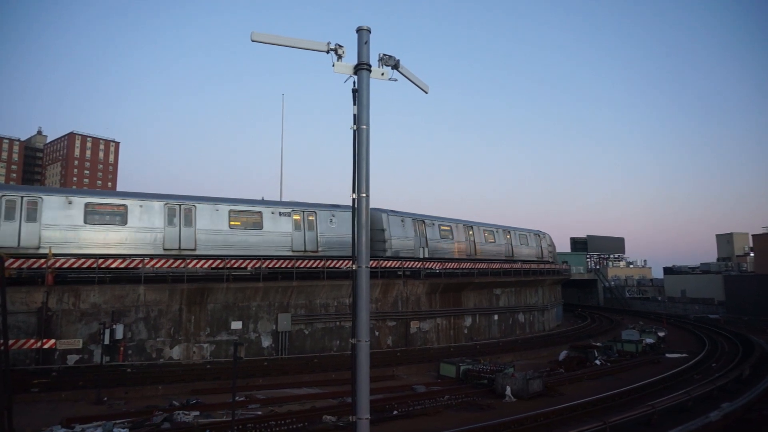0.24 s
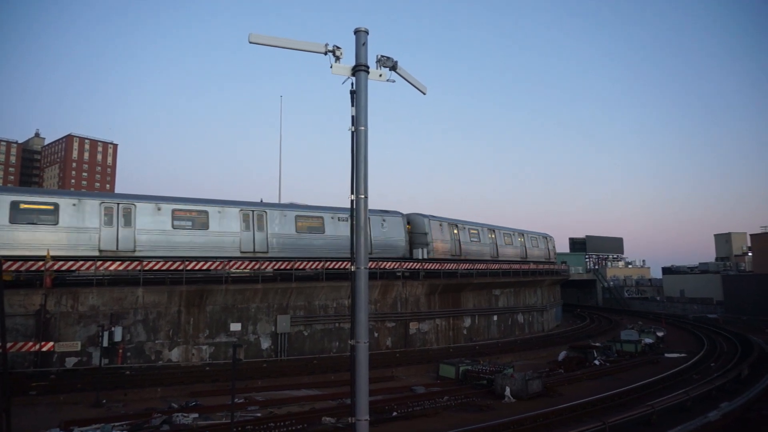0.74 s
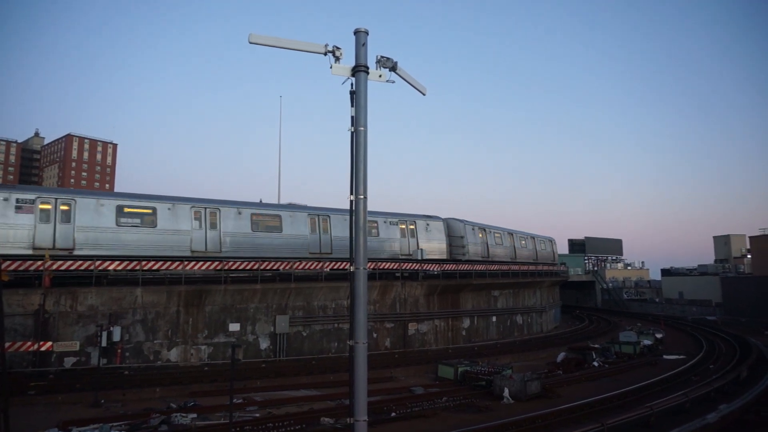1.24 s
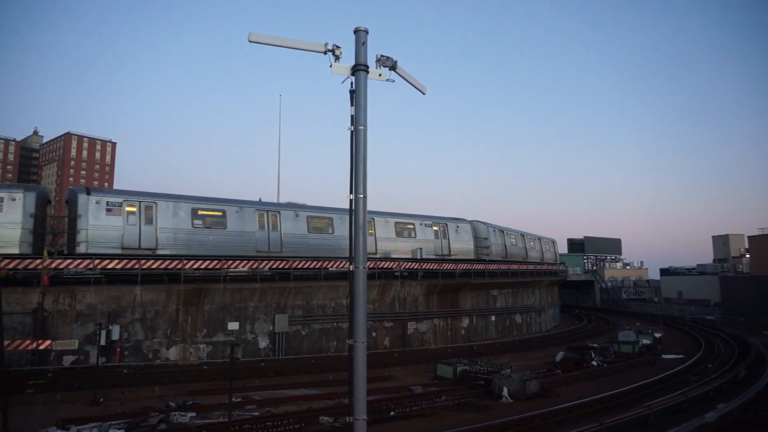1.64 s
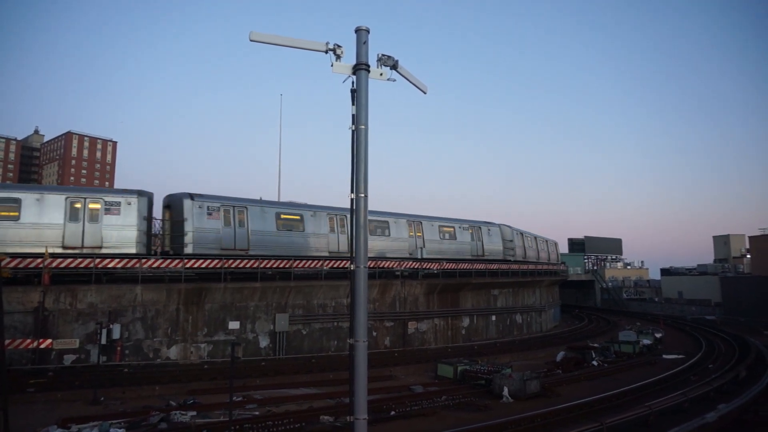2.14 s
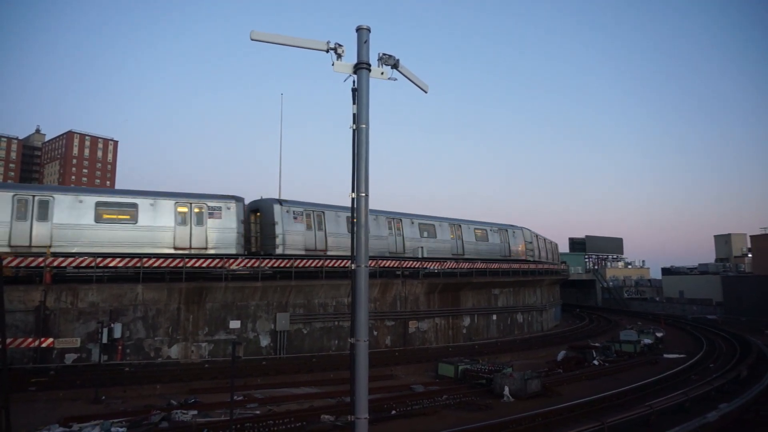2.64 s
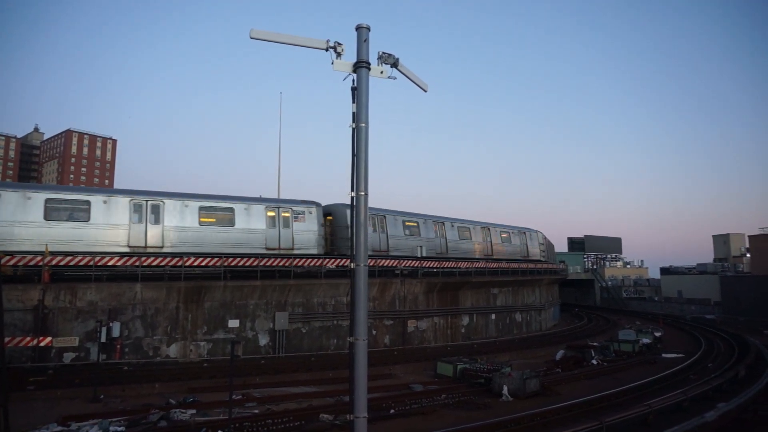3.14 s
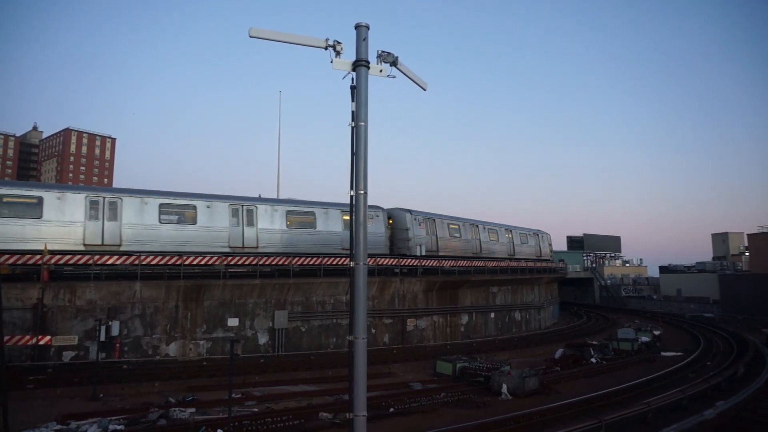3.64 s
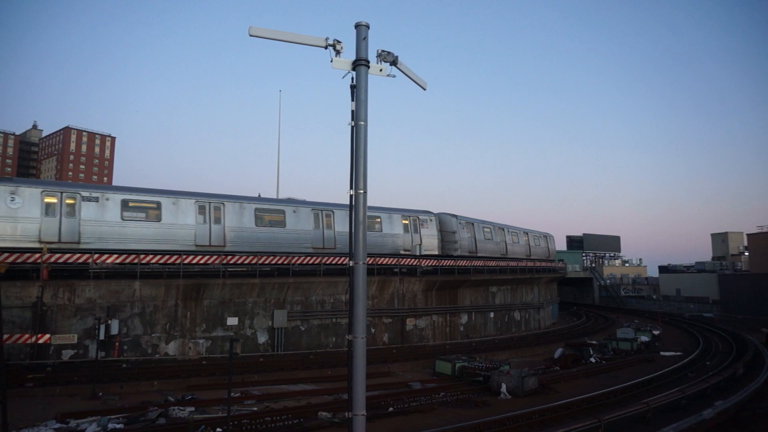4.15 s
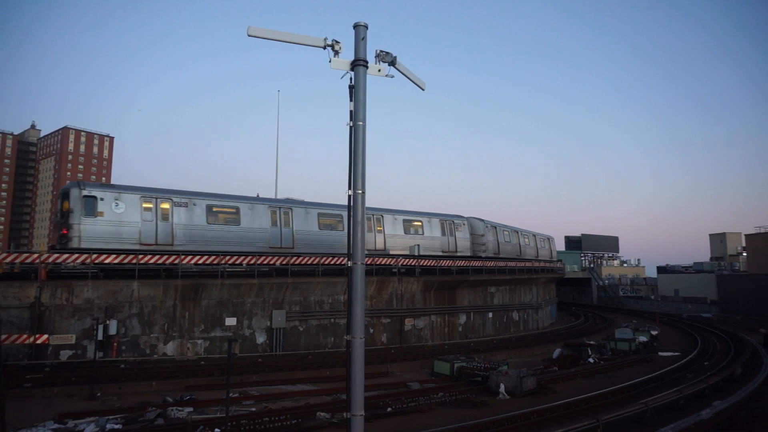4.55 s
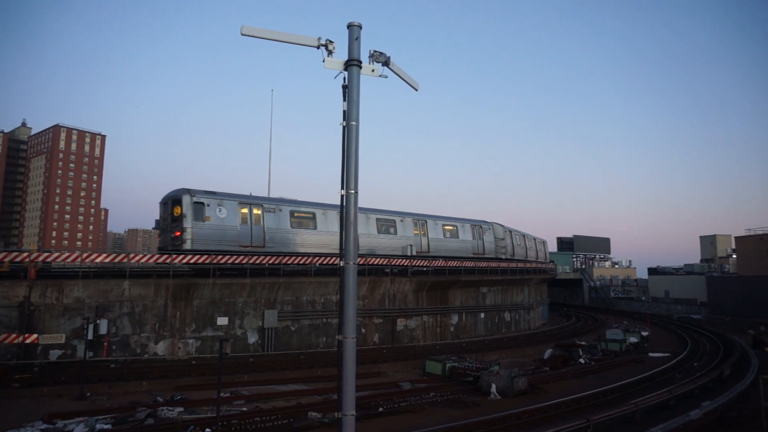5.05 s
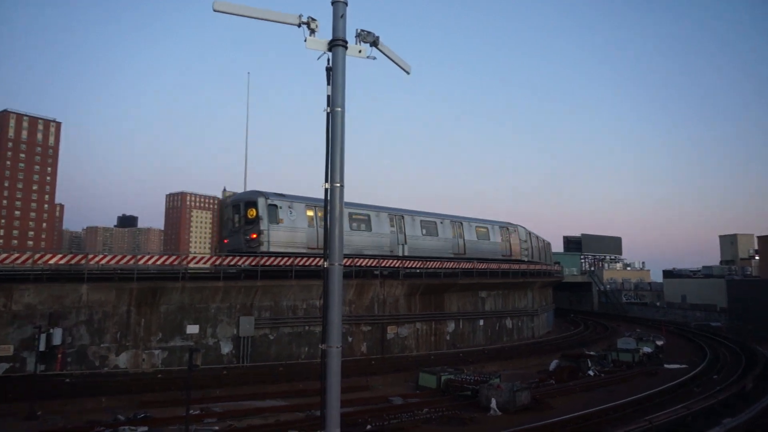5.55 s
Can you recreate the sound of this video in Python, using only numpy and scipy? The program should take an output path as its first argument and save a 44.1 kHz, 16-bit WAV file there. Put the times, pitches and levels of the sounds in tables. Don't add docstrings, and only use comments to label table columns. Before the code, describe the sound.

A train of steel cars rolls round an elevated curve, heard outdoors from across the yard in nearly central stereo. It begins mid-roll with a full, bright roar and a faint very high whine. By 0.4 s a piercing squeal has caught; from 0.6 s it turns raspy and broken, chopped by tiny dropouts as wheels grip and slip, while the roar eases between about 0.8 and 1.7 s. The higher whine sinks slowly in overlapping strands. Bright scrapes and breathy grit come near 0.5, 1.8 and 3.3 s, the last two with a lower scraping tone, and a small tick at 2.9 s. Low structural thumps are heaviest around 3.0 s. The high whine peaks near 4.0 s and the purer main squeal near 4.6 s. After 5 s the rolling grows duller and squeals weaken and falter, then another wheel joins before the cut at 5.8 s.

```python
import sys
import numpy as np
from scipy import signal
from scipy.fft import rfft, irfft, next_fast_len
from scipy.io import wavfile

SR = 44100
rng = np.random.default_rng(int(sys.argv[2]) if len(sys.argv) > 2 else 0)


def elevation(decibels):
    levels = np.asarray(decibels, float)
    return 10 ** (levels / 20)


def transcribe(u):
    v = np.clip(np.atleast_2d(u).T, -1, 1)
    q = np.round(v * 32767).astype(np.int16)
    wavfile.write(sys.argv[1], SR, q)


N = 254898


def squeal():
    return elevation(0.44) * (low_wheel() + late_wheel() + high_wheels())


# time_s, tone_db, rough_db
LOW_SLIP = [(0.1, -62, -50), (.25, -38, -59), (.4, -20, -51), (.62, -21, -24.5), (.9, -18.5, -26),
            (1.4, -21, -24), (1.55, -17, -27.5), (1.9, -27, -24), (2.2, -20, -28.5), (2.4, -22.5, -31.5),
            (3.35, -22, -27), (3.6, -25.5, -31.5), (4.36, -27, -33), (4.56, -18, -41), (4.95, -24.5, -36.5),
            (5.2, -33, -40), (5.5, -28, -43), (5.78, -32, -35)]
# time_s, depth_db, half_length_s
LOW_GRIPS = [(0.619, -4.7, 0.0098), (0.686, -5.5, 0.019), (0.994, 2, 0.012), (1.06, -7, 0.018),
             (1.201, -11, 0.01), (1.379, -3, 0.014), (1.441, -4.5, 0.029), (1.696, -9, 0.015),
             (1.896, -3.5, 0.018), (1.995, -12, 0.0079), (2.183, -5.5, 0.12), (2.267, -0.5, 0.023),
             (2.407, 0, 0.01), (2.48, -2, 0.014), (2.55, -7.5, 0.024), (2.915, -3, 0.023),
             (3.017, -9, 0.012), (3.151, -7.5, 0.021), (3.287, -11.5, 0.0054), (3.402, -15, 0.0093),
             (3.552, -15, 0.013), (3.791, -6, 0.026), (3.957, -10.4, 0.035), (4.18, -9, 0.039),
             (4.442, -10.5, 0.019), (4.837, -4.5, 0.027), (5.096, -10.0, 0.014), (5.24, -13, 0.023),
             (5.48, -25, 0.036), (5.693, -3, 0.022)]


def low_wheel():
    hz = low_hz() + 3 * drift(6.17, count=N, order=2)
    tone_db = in_time(LOW_SLIP)[0] + grip_db(LOW_GRIPS)
    return mode(hz, tone_db, clean=0.89, width_hz=17.0, alike=0.97)


def low_hz():
    start_s, first_hz, last_hz, settle_s = .3, 4794, 4694, 2.8
    elapsed_s = np.maximum(np.arange(N) / SR - start_s, 0)
    return last_hz + (first_hz - last_hz) * np.exp(-elapsed_s / settle_s)


# time_s, pitch_hz, level_db
LATE_WHEEL = [
    (5.1, 4785, -41),
    (5.49, 4782, -42),
    (5.56, 4779, -29),
    (5.78, 4765, -26),
]


def late_wheel():
    out = np.zeros((2, N))
    add(out, LATE_WHEEL, clean=0.69, width_hz=20, alike=0.75)
    return out


# start_s, end_s, first_hz, sink_hz_per_s
HIGH_WHEELS = [
    (0, .55, 6558, 15),
    (.6, 1.95, 6590, 28),
    (1.85, 2.65, 6594, 27),
    (2.6, 5.78, 6543, 31),
    (1.85, 4.4, 6497, 21),
]
HIGH_WHEELS_DB = [-1.5, -0.7, -1.5, -.1, -9.5]
# time_s, tone_db, rough_db
HIGH_SLIP = [(0, -30.5, -35), (.2, -32.5, -35.5), (.6, -38, -38.5), (.8, -29, -33), (1.0, -26, -32),
             (1.4, -35, -33.5), (1.85, -31.5, -36), (2.0, -31.5, -27.5), (2.3, -24, -30.5),
             (2.7, -30.5, -30), (3.2, -27, -29.5), (3.55, -31, -27), (4.0, -19.5, -27.5), (4.4, -26.5, -28),
             (4.8, -24.5, -29), (5.1, -26.5, -33), (5.35, -37, -36.5), (5.78, -26.5, -31.5)]
# time_s, depth_db, half_length_s
HIGH_GRIPS = [(0.607, -12, 0.029), (0.846, -12, 0.011), (0.908, -10.5, 0.042), (1.233, -6.2, 0.059),
              (1.533, -15, 0.021), (1.844, -7.7, 0.062), (1.981, -11, 0.022), (2.147, -6, 0.017),
              (2.265, -5.3, 0.02), (2.424, -7, 0.026), (2.57, -5.2, 0.044), (2.802, -5, 0.011),
              (2.865, -3, 0.016), (2.945, -7, 0.024), (3.089, -7, 0.055), (3.207, -5, 0.014),
              (3.271, -4, 0.015), (3.328, -5, 0.038), (3.767, -9.5, 0.023), (3.901, -12, 0.016),
              (3.987, -6.5, 0.024), (4.137, -11.5, 0.018), (4.288, -4.5, 0.02), (4.45, -10, 0.0079),
              (4.534, -1, 0.028), (4.711, -11, 0.014), (4.887, -7, 0.025), (5.027, -2, 0.022),
              (5.286, -14, 0.049), (5.45, -9, 0.033)]


def high_wheels():
    eases_s = 5.15
    out = np.zeros((2, N))
    for (start_s, end_s, first_hz, sink_hz_per_s), level_db in zip(HIGH_WHEELS, HIGH_WHEELS_DB):
        times_s = np.array([start_s, min(end_s - .01, eases_s), end_s])
        hz = first_hz - sink_hz_per_s * (np.minimum(times_s, eases_s) - start_s)
        rows = np.transpose([times_s, hz, level_db + 0 * hz])
        add(out, rows, clean=0.71, width_hz=16.0, alike=1.0)
    return out * elevation(in_time(HIGH_SLIP)[0] + grip_db(HIGH_GRIPS))


def rasp():
    return low_rasp() + high_rasp() + octave_rasp()


def low_rasp():
    tone_db, rough_db = in_time(LOW_SLIP)
    hz = low_hz()
    skirt_db = -27.5 + 0.33 * (rough_db + 30) + 0.16 * (tone_db + 22)
    out = mode(hz + 12, rough_db + 0.27, clean=0, width_hz=47, alike=0.77)
    out += mode(hz + 30, skirt_db, clean=0, width_hz=141, alike=0.84)
    return out * elevation(0.32 * grip_db(LOW_GRIPS))


def high_rasp():
    rough_db = in_time(HIGH_SLIP)[1]
    hz = low_hz()
    hz = 6550 * hz / hz.mean()
    out = mode(hz, rough_db - .51, clean=0, width_hz=81, alike=0.83)
    out += mode(hz + 40, rough_db - 3.5, clean=0, width_hz=234, alike=0.77)
    return out * elevation(0.26 * grip_db(HIGH_GRIPS))


def octave_rasp():
    rough_db = in_time(LOW_SLIP)[1]
    level_db = -46 + 1.3 * (rough_db + 30) - np.arange(N) / SR
    level_db += 0.26 * grip_db(LOW_GRIPS) + 2.1 * drift(5.7, count=N, order=2)
    return mode(2 * low_hz() + 40, level_db, clean=0, width_hz=150, alike=0.9)


# start_s, length_s, first_hz, level_db
SCRAPES = [(0, .45, 8485, -51), (.5, .28, 8480, -45), (.48, .27, 10295, -48), (1.8, .32, 8460, -47),
           (1.82, .3, 8330, -45), (1.82, .33, 10315, -49), (1.85, .3, 10140, -54), (1.75, .38, 1830, -36.5),
           (3.26, .36, 8440, -44), (3.3, .55, 8330, -46), (3.2, .65, 10255, -44), (3.2, .62, 10130, -47),
           (3.2, .55, 1810, -36.5), (4.35, 1.4, 8335, -57), (0, .65, 3060, -46), (.05, .4, 6655, -41),
           (3.5, .3, 10600, -57), (2.1, 1.2, 10300, -59), (1.0, .9, 8430, -60)]


def scrapes():
    out = np.zeros((2, N))
    attack_s, fade_share, sag_per_s = .08, .5, .006
    for start_s, length_s, first_hz, level_db in SCRAPES:
        times_s = np.array([0, attack_s, length_s * (1 - fade_share), length_s])
        hz = first_hz * (1 - sag_per_s * times_s)
        swell_db = level_db + np.array([-10, 3.5, 1, -12])
        tone = np.transpose([start_s + times_s, hz, swell_db])
        skirt = np.transpose([start_s + times_s, hz, swell_db - 5])
        add(out, tone, clean=.4, width_hz=42, alike=.85)
        add(out, skirt, clean=0, width_hz=0.023 * first_hz, alike=.85)
    return out


# start_s, length_s, level_db
PUFFS = [
    (.315, .09, -42),
    (.53, .2, -47),
    (1.78, .3, -47),
    (2.885, .025, -41),
    (3.25, .3, -49),
    (5.17, .05, -48),
]


def puffs():
    t, level = np.arange(N) / SR, np.zeros(N)
    for start_s, length_s, level_db in PUFFS:
        shape = np.interp(t, [start_s, start_s + .004, start_s + length_s], [0, 1, 0]) ** .5
        level += elevation(level_db) * shape
    noise = rng.standard_normal(N) + .25 * rng.standard_normal((2, N))
    bright = signal.butter(3, [7600, 10600], "band", fs=SR, output="sos")
    return level * rms_one(signal.sosfilt(bright, noise))


# freq_hz, density_db_per_hz
ROAR = [(25, -38.5), (97, -13.5), (230, -8.5), (420, -7.5), (1050, -5.5), (1350, -10.5), (2900, -17),
        (3400, -22.5), (4400, -23), (5700, -28), (7300, -31), (9000, -35), (11200, -37)]
# freq_hz, width_hz, gain_db
BOOMS = [
    (308, 86, 6),
    (587, 280, 6),
    (886, 160, 1.5),
]
# freq_hz, likeness
LIKENESS = [(30, .4), (85, .72), (180, .58), (340, .72), (700, .92), (1400, .72), (2800, .62), (5300, .88),
            (11000, .84)]
ROLL_CENTRES_HZ = (110, 600, 2400, 7500)


def roar(patchy_db, bump_db):
    size = next_fast_len(N)
    hz = np.maximum(np.arange(size // 2 + 1) * SR / size, 1)
    colour_db = at_hz(ROAR, hz)
    for freq_hz, width_hz, gain_db in BOOMS:
        colour_db = colour_db + gain_db / (1 + (2 * (hz - freq_hz) / width_hz) ** 2)
    alike = np.clip(at_hz(LIKENESS, hz), -1, 1)
    mid, side = rfft(rng.standard_normal((2, size))) * elevation(colour_db) * (hz > 15)
    ears = np.sqrt(1 + alike) * mid + np.sqrt(1 - alike) * side * [[1], [-1]]

    levels_db = roll_levels()
    levels_db -= 10 * np.log10(np.mean(elevation(levels_db[:, ::100]) ** 2, axis=1, keepdims=True))
    out, bumps = np.zeros((2, N)), drift(18, count=N, order=1)
    centres_hz = np.geomspace(40, 9000, 13)
    for k, centre_hz in enumerate(centres_hz):
        window = np.interp(np.log(hz), np.log(centres_hz), np.arange(len(centres_hz)) == k)
        band = irfft(ears * window, size)[:, :N]
        place = np.interp(np.log(centre_hz), np.log(ROLL_CENTRES_HZ), range(4))
        below = min(int(place), 2)
        level_db = levels_db[below] + (place - below) * (levels_db[below + 1] - levels_db[below])
        level_db = level_db * min(centre_hz / 90, 1)
        level_db = level_db + patchy_db * drift(7.0, count=N, order=1)
        level_db = level_db + bump_db * bumps * (centre_hz > 300)
        out += band * elevation(level_db.astype(np.float32))
    return elevation(-19.92) * rms_one(out)


# time_s, level_db, brightness_db
ROLL = [(0, -18.5, 4.5), (.05, -17.5, 2.5), (.58, -20.5, 3.7), (.76, -25, 3), (1.24, -25.5, 3),
        (1.29, -24, 1.4), (1.72, -24.5, 2), (1.84, -22, 3.5), (2.4, -21.5, 4.5), (2.6, -23, 2),
        (2.8, -20.5, 0.5), (3.2, -21, 2.5), (3.6, -21, 0.8), (4.25, -20.5, 2.6), (4.55, -20.5, 5.5),
        (4.9, -21, -.5), (5.3, -22, -4.5), (5.78, -22, -1)]
# time_s, level_db
JOINTS = [(.5, 2), (.67, 1.5), (.9, 4.5), (.98, 3), (1.3, 4.5), (1.51, 4), (1.81, 1.5), (1.88, 0),
          (2.44, 0.5), (2.59, 2.5), (2.91, 1.5), (3.29, -3.5), (3.44, 2), (3.55, 1.5), (3.71, 4.5),
          (3.96, 4), (4.14, 1.5), (4.69, 1.5), (4.85, 3), (4.96, 4), (5.07, 2.5), (5.18, 5), (5.44, 2.5),
          (5.69, 5)]
# time_s, level_db
LULLS = [
    (.77, -1.5),
    (2.71, -1),
    (3.37, -4),
    (5.01, -3),
    (5.11, -1),
    (5.47, -4),
    (5.74, -3.5),
]
# time_s, level_db
THUMPS = [(.47, 4), (2.01, 4.5), (2.43, 4.5), (2.74, 2.5), (2.98, 10.5), (3.11, 7.5), (3.43, 1.5),
          (4.46, 6), (5.07, 3), (5.23, -1.5), (5.54, 1.5)]
FOLLOW_LEVEL = [1.36, 0.99, 1.01, 0.4]
FOLLOW_BRIGHT = [-1.5, -0.05, 0.58, 0.67]
FOLLOW_JOINT = [.3, 1.01, 0.52, 0.86]
FOLLOW_LULL = [.3, .9, 1.1, 1.2]


def roll_levels():
    controls_db = [*in_time(ROLL), bumps_db(JOINTS, half_s=0.019), bumps_db(LULLS, half_s=0.032)]
    follow = np.transpose([FOLLOW_LEVEL, FOLLOW_BRIGHT, FOLLOW_JOINT, FOLLOW_LULL])
    levels_db = follow @ controls_db
    levels_db[0] += bumps_db(THUMPS, half_s=0.044)
    return levels_db


def mode(hz, level_db, clean, width_hz, alike):
    a, b, c, d = [drift(width_hz, count=len(hz), order=3) for k in range(4)]
    phase = 2 * np.pi * np.cumsum(hz) / SR
    cos, sin = np.cos(phase), np.sin(phase)
    clean, alike = np.clip(clean, 0, 1), np.clip(alike, 0, 1)
    mid = np.sqrt(2 * clean) * cos + np.sqrt(1 - clean) * (a * cos + b * sin)
    side = c * cos + d * sin
    ears = np.sqrt((1 + alike) / 2) * mid + np.sqrt((1 - alike) / 2) * side * [[1], [-1]]
    return elevation(level_db) * ears


def add(out, rows, **voice):
    s, hz, level_db = np.transpose(rows)
    first, last = round(s[0] * SR), min(round(s[-1] * SR), N)
    t = np.arange(first, last) / SR
    since_s = t - s[0] + (first == 0)
    left_s = s[-1] - t + (last > N - 400)
    edge = np.clip(np.minimum(since_s, left_s) / .03, 0, 1)
    out[:, first:last] += edge * mode(np.interp(t, s, hz), np.interp(t, s, level_db), **voice)


def grip_db(rows):
    return bumps_db(rows, np.array(rows)[:, 2])


def bumps_db(rows, half_s):
    t = np.arange(0, N / SR, .002)
    s, db = np.transpose(rows)[:2]
    bells = np.exp(-((t[:, None] - s) / half_s) ** 2)
    return np.interp(np.arange(N) / SR, t, bells @ db)


def drift(rate_hz, count, order):
    sos = signal.butter(order, rate_hz, fs=SR / 20, output="sos")
    slow = signal.sosfilt(sos, rng.standard_normal(count // 20 + 2002))[2000:]
    return np.interp(np.arange(count) / 20, np.arange(len(slow)), rms_one(slow))


def in_time(rows):
    s, *columns = np.transpose(rows)
    return [np.interp(np.arange(N) / SR, s, c) for c in columns]


def at_hz(points, hz):
    freq_hz, value = np.transpose(points)
    return np.interp(np.log(hz), np.log(freq_hz), value)


def rms_one(x):
    return x / np.sqrt(np.mean(np.abs(x) ** 2) + 1e-20)


def scene():
    return squeal() + scrapes() + rasp() + puffs() + roar(patchy_db=1.25, bump_db=0.73)


def roll_off(x):
    return signal.sosfilt(signal.butter(12, 11010, fs=SR, output="sos"), x)


def record(dry):
    rounded = .95 * np.tanh(dry / 0.92)
    return roll_off(rounded)


dry = scene()
out = record(dry)
transcribe(out)
```